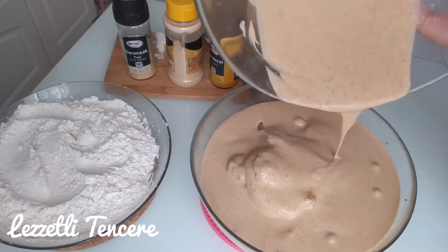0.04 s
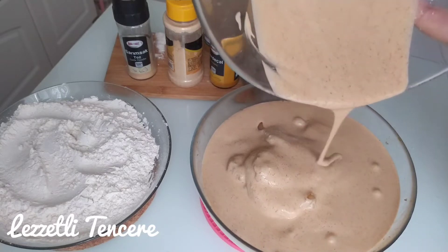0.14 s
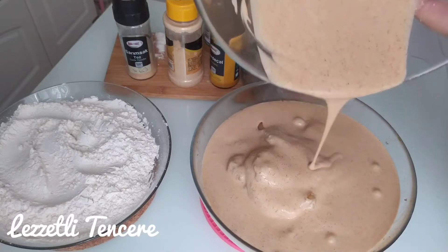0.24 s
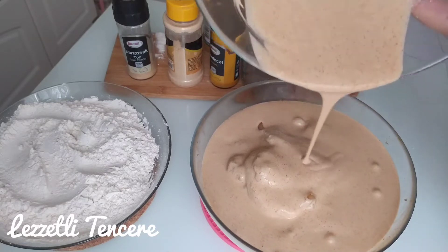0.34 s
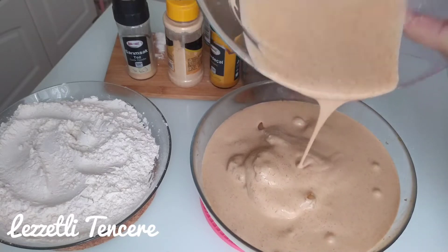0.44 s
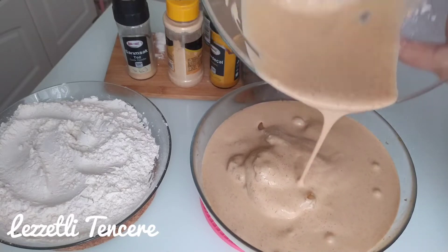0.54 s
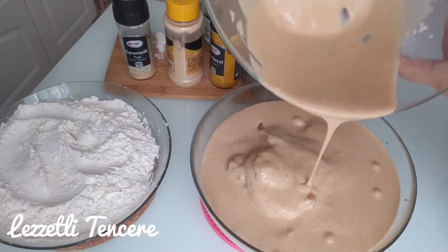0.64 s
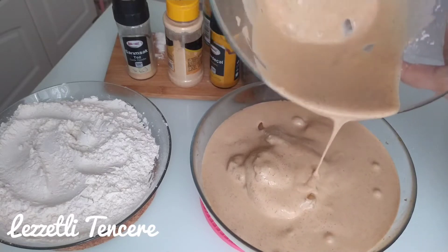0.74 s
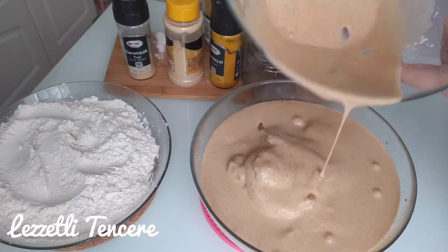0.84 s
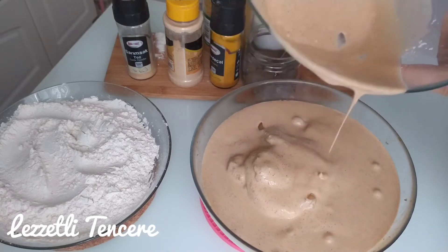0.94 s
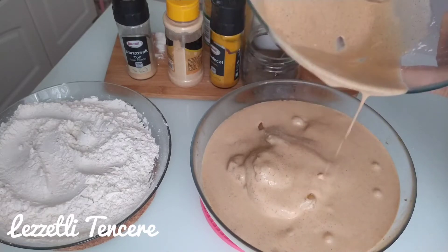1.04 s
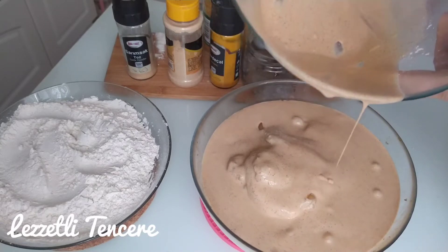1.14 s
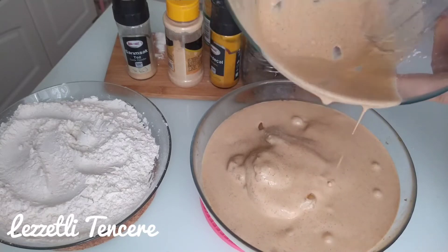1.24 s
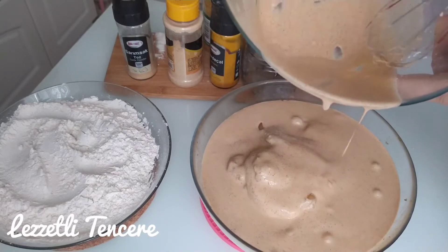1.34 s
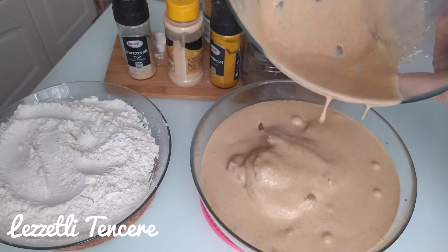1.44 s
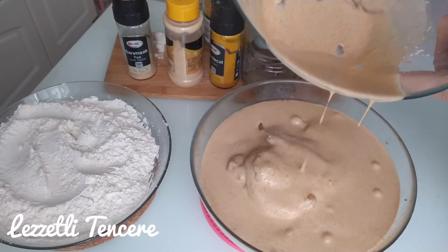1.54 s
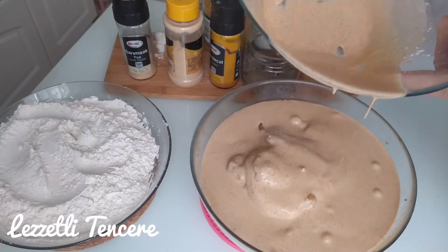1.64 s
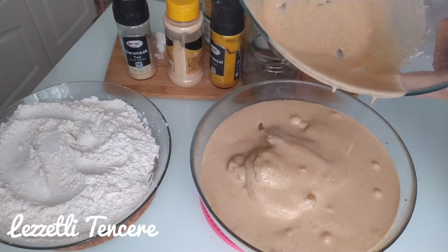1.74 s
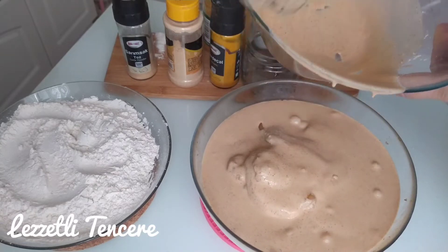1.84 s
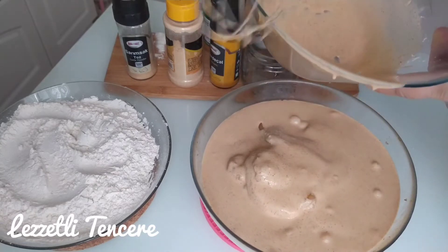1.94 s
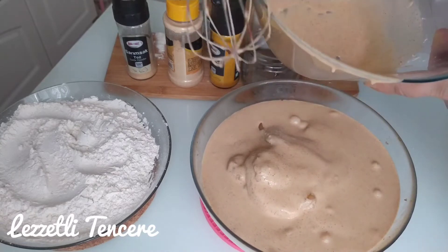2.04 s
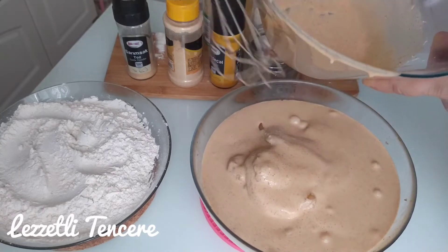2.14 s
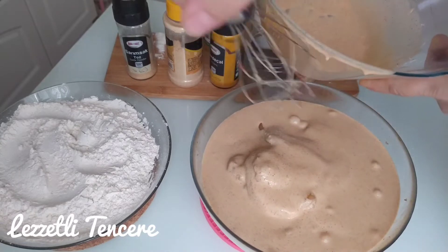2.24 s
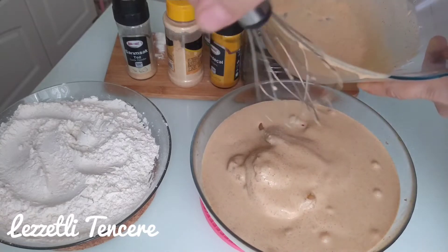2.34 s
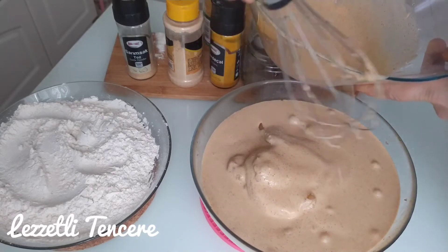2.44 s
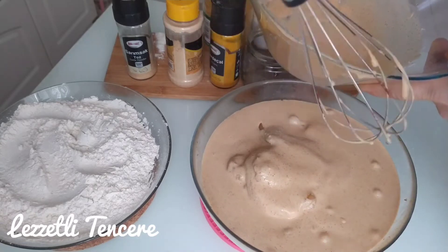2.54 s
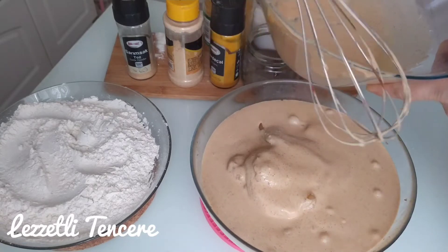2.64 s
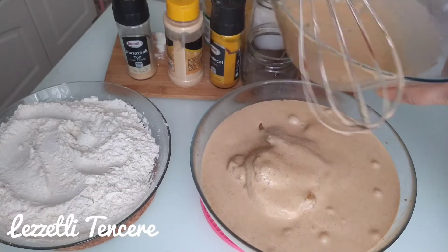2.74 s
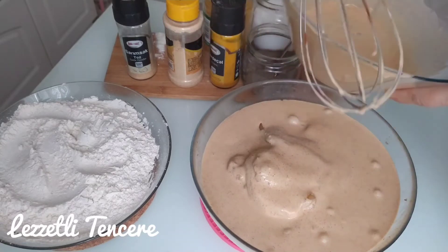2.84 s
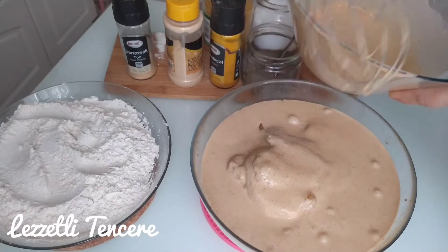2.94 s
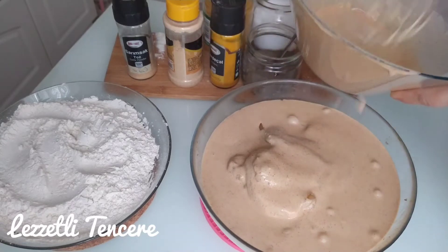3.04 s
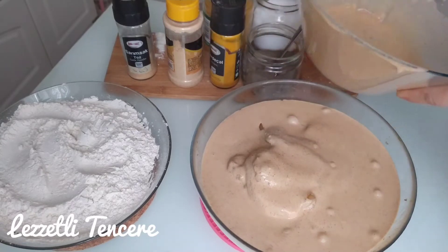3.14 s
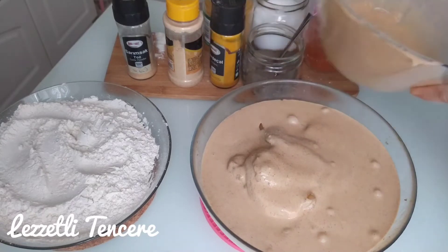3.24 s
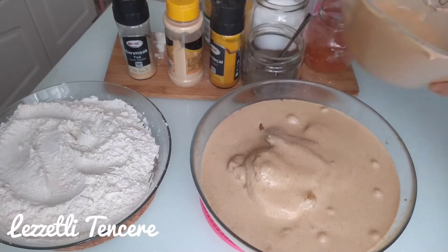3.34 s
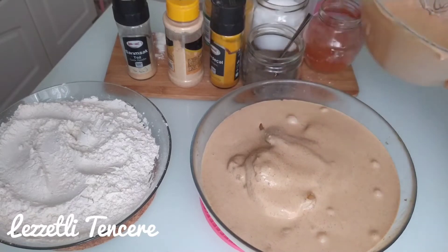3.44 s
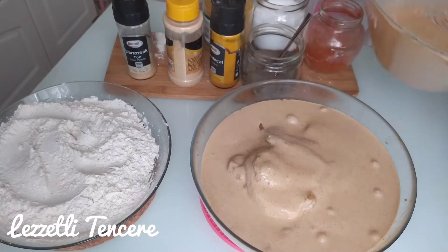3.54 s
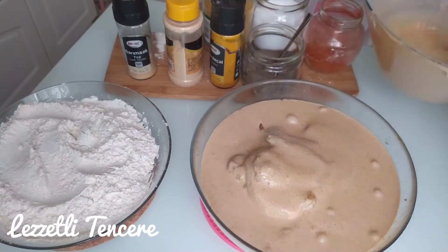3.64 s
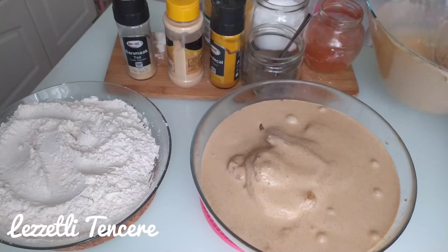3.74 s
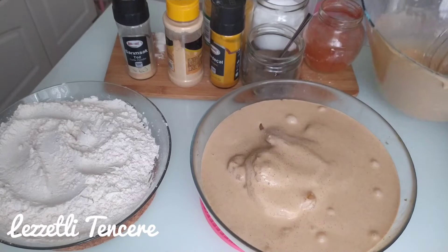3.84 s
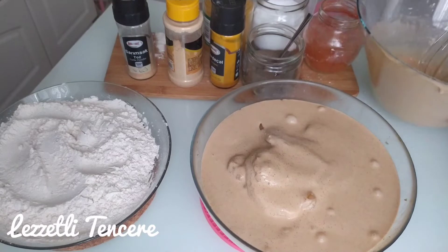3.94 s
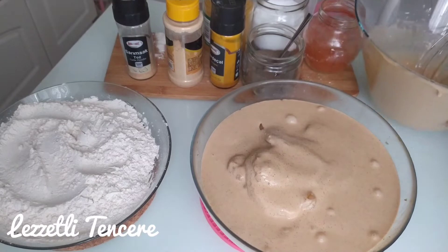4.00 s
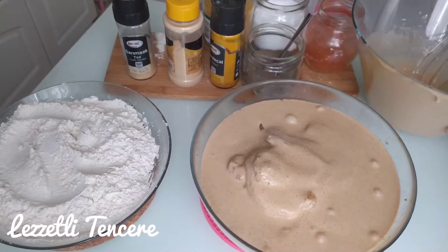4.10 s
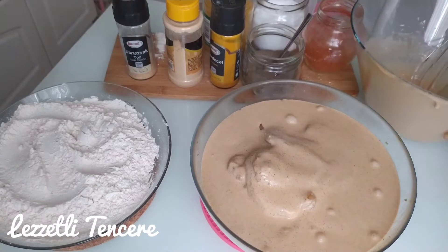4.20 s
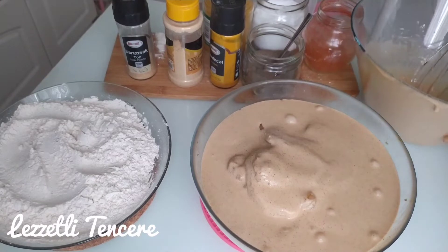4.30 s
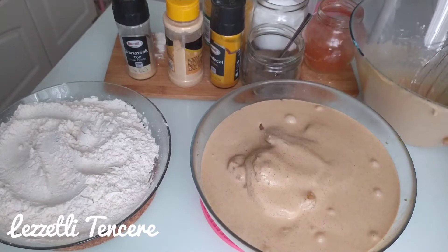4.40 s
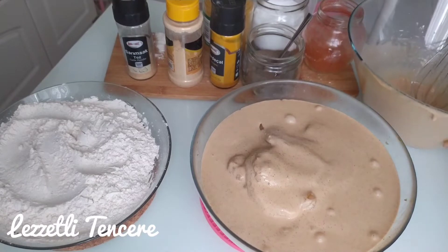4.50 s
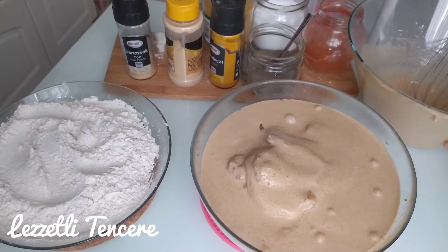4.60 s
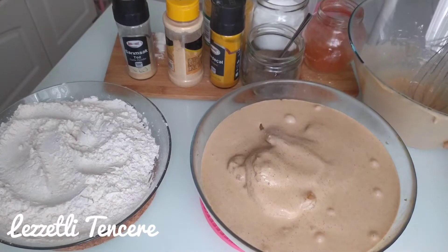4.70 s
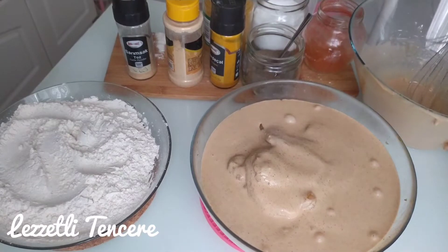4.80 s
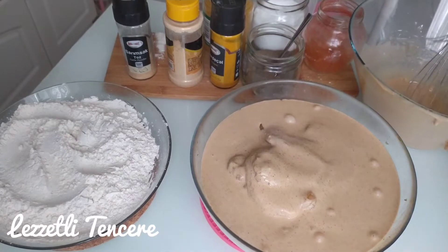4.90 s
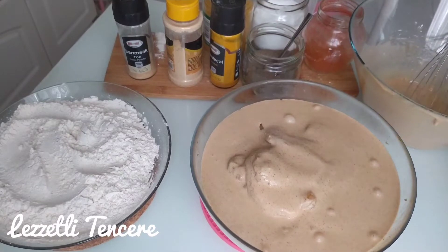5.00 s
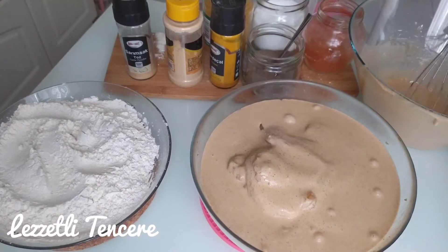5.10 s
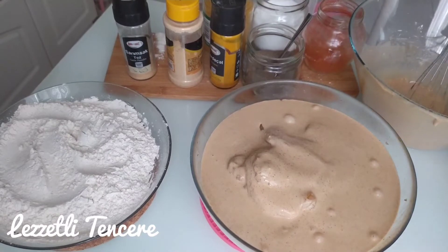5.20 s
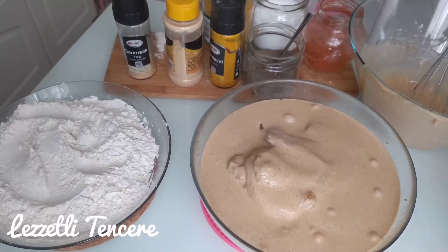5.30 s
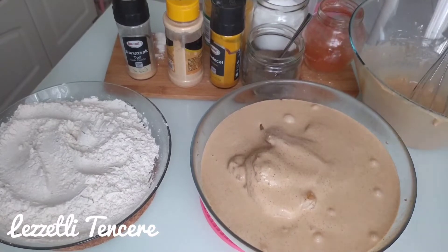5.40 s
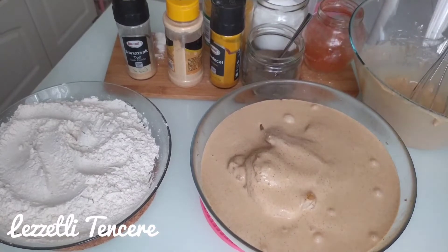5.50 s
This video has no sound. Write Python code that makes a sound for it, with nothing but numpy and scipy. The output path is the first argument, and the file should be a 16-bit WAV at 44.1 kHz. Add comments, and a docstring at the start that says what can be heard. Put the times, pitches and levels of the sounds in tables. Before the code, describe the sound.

Soft batter drips, a sharp glass clink, a heavy whisk knock with bounces, another clink and a bowl set down in a small kitchen.

```python
"""A kitchen table: a batter-coated glass bowl is emptied into another, heard as a few soft drips.
Its rim clinks on glass, a wire whisk drops into it and bounces, and the bowl is set down, rocking.
Glass, wires, handle and table are damped modes; contacts are noise bursts; drips are narrow noise.
Each blow gets a diffuse answer from the small hard kitchen; an appliance hums and rushes faintly."""
import sys
import numpy as np
from scipy import signal
from scipy.fft import rfft, irfft, next_fast_len
from scipy.io import wavfile
from scipy.ndimage import map_coordinates

SR = 44100
rng = np.random.default_rng(int(sys.argv[2]) if len(sys.argv) > 2 else 0)


def log_audio(samples):
    """Write samples as a 16-bit WAV file to the path given in sys.argv[1]."""
    # one column per channel
    frames = np.atleast_2d(samples).T
    # limit to full scale, then quantise
    limited = np.clip(frames, -1, 1)
    pcm = np.round(limited * 32767).astype(np.int16)
    wavfile.write(sys.argv[1], SR, pcm)


N = 245088
T = np.arange(SR * 3 // 4) / SR  # time axis of one blow, s

# stereo likeness of close blows: frequency_hz, left_right_likeness
ALIKE = [(30, 0.52), (130, 0.95), (550, 0.62), (1100, 0), (2000, 0), (12000, 0)]
# whisk wires on glass, contact spectrum: frequency_hz, level_db
WIRES = [(100, -10), (450, 1.5), (1100, -3.5), (2300, -4), (3300, -5.5), (4600, -0.5), (6000, -2.5),
         (7000, -1.5), (10000, 2.5), (12500, -5.5), (15000, -18)]
# standing glass bowl, modes: frequency_hz, level_db, t60_s
STANDING_BOWL = [(925, -3, .06), (1040, -3, .06), (1104, 1, .08), (1319, -1, .08), (1863, -1, .11),
                 (1932, -5, .09), (2326, -11, .07), (2492, -8, .08), (2724, -4, .08), (2800, -6, .06),
                 (3380, -4, .08), (4196, 0, .1), (4275, 1, .09), (5265, -5, .09), (5320, -4, .1),
                 (6980, -7, .08), (7640, -10, .08), (9000, -6, .09)]
# bowl foot on table, contact spectrum: frequency_hz, level_db
LANDING_CRACK = [(60, -63), (480, 4), (750, 3), (1100, 2), (1500, 2.5), (2700, -3.5), (3100, -7),
                 (3400, -3), (3750, -8), (4250, 0), (4800, -4.5), (5300, -10), (5700, -10.5), (6800, -6),
                 (10000, -6), (12500, -6), (15000, -26)]

BUZZ_DB, BUZZ_RATE_PER_S = 3, 240  # glass and handle flutter: depth, knot rate


def amp(db):
    """Decibels to gain."""
    return 10 ** (np.asarray(db) / 20)


def fade(t60_s):
    """Exponential decay, 60 dB in t60_s."""
    return np.exp(-np.log(1000) * T / t60_s)


def unit(x):
    """Scale to rms 1."""
    return x / np.sqrt(np.mean(x ** 2) + 1e-20)


def unit_blow(x):
    """Scale to the energy of 10 ms at rms 1."""
    return unit(x) * np.sqrt(.01 / T[-1])


def along(points, hz):
    """Interpolate (Hz, value) points on a log frequency axis."""
    f, v = np.transpose(points)
    return np.interp(np.log(hz + 1), np.log(f), v)


def filtered(x, response):
    """Apply a frequency response by FFT."""
    n = x.shape[-1]
    m = next_fast_len(n + 8192)
    return irfft(rfft(x, m) * response(np.fft.rfftfreq(m, 1 / SR)), m)[..., :n]


def lowpass_denominator(f, hz):
    """Second-order Butterworth denominator with corner hz."""
    return 1 + 1j * np.sqrt(2) * f / hz - (f / hz) ** 2


def soften(x, hz):
    """A softer contact lasts longer and excites less treble: low-pass at hz."""
    return unit_blow(filtered(x, lambda f: 1 / lowpass_denominator(f, hz)))


def radiate(x, hz):
    """A small body radiates bass poorly: high-pass at hz."""
    return filtered(x, lambda f: -(f / hz) ** 2 / lowpass_denominator(f, hz))


def wobble(rate_per_s, size=N):
    """Smooth random curve through rate_per_s knots a second."""
    knots = rng.standard_normal(int(size * rate_per_s / SR) + 4)
    return map_coordinates(knots, [np.arange(size) * rate_per_s / SR])


def noise(response, size, alike=ALIKE):
    """Coloured stereo noise of rms 1; mid and side weights set the likeness by frequency."""
    def shape(hz):
        angle = np.arccos(np.clip(along(alike, hz), -1, 1)) / 2
        return response(hz) * np.array([np.cos(angle), np.sin(angle)])

    mid, side = filtered(rng.standard_normal((2, size)), shape)
    return unit(np.array([mid + side, mid - side]))


def crack(spectrum, t60_s, rise_s=0.0051):
    """Dense contact vibration: coloured noise that builds over rise_s and dies."""
    burst = noise(lambda hz: amp(along(spectrum, hz)), size=len(T))
    return unit_blow(burst * fade(t60_s) * (1 - np.exp(-T / rise_s)))


def ring(modes, scatter_db, spread=1, detune=0, buzz_db=0):
    """Damped modes, randomly scattered in level and pitch; unlike channels differ in phase."""
    out = np.zeros((2, len(T)))
    for k, (hz, db, t60_s) in enumerate(modes):
        hz = hz * (1 + detune * rng.standard_normal())
        skew = (-1) ** k * spread * np.arccos(np.clip(along(ALIKE, hz), -1, 1)) / 2
        flutter_db = buzz_db * wobble(BUZZ_RATE_PER_S, size=len(T)) if buzz_db else 0
        gain = amp(db + scatter_db * rng.standard_normal() + flutter_db)
        out += gain * fade(t60_s) * np.sin(2 * np.pi * hz * T + [[skew], [-skew]])
    return unit_blow(out * (1 - np.exp(-T / 0.00053)))


def kitchen(x, wet_db, build_s=0.0044):
    """Add the walls' diffuse answer: a noise tail, thickening over build_s, decaying by band."""
    # frequency_hz, t60_s
    wall_t60 = [(150, 0.43), (500, 0.39), (1500, 0.38), (5000, 0.3), (9000, 0.31), (14000, 0.2)]
    # frequency_hz, level_db
    wall_colour = [(60, 3.5), (200, -1.5), (480, -3.5), (700, 3), (950, -4), (1900, 0), (2600, 3),
                   (3700, -1), (5100, -1), (5700, 0), (6400, 0.5), (10000, -1), (15000, -4)]
    source = noise(lambda f: amp(along(wall_colour, f)), size=len(T))
    hz, t, bands = signal.stft(source, SR, nperseg=256)
    bands = bands * np.exp(-np.log(1000) * t / along(wall_t60, hz)[:, None])
    tail = signal.istft(bands, SR, nperseg=256)[1][:, :len(T)]
    tail = unit(tail * (1 - np.exp(-(T / build_s) ** 2))) / np.sqrt(len(T))
    return x + amp(wet_db) * signal.fftconvolve(x[:1], tail, axes=1)[:, :len(T)]


def add(track, start_s, x, pan_db=0):
    """Mix x in at start_s, leaning left by pan_db."""
    part = track[:, round(start_s * SR):][:, :len(T)]
    part += (x * amp([[pan_db / 2], [-pan_db / 2]]))[:, :part.shape[1]]


def favour(modes, hz):
    """The contact point excites the modes near hz most."""
    gain_db, width_octaves = 6, 0.076
    return [(f, db + gain_db * np.exp(-(np.log2(f / hz) / width_octaves) ** 2), t60_s)
            for f, db, t60_s in modes]


def appliance():
    """Steady air noise plus motor harmonics whose shared speed and separate levels waver."""
    # air noise: frequency_hz, density_db_per_hz
    air = [(25, 1), (50, -8), (75, -12.5), (120, -15), (155, -3.5), (240, -5.5), (380, -11), (560, -12.5),
           (660, -9), (850, -19.5), (1050, -18), (1400, -23), (2850, -25.5), (3500, -30.5), (6500, -29.5),
           (9500, -27.5), (11500, -34), (15500, -44.5)]
    # diffuse air: frequency_hz, left_right_likeness
    air_alike = [(30, 0.0063), (130, 0.86), (300, 0.71), (640, 0), (1400, 0)]
    # motor partials: multiple_of_motor_hz, level_db
    motor = [(9, -76.5), (10, -73), (13, -63.5), (14, -84), (20, -81), (22, -79.5), (56, -84)]
    motor_hz = 49.3
    out = amp(-57.0) * noise(lambda f: amp(along(air, f)), size=N, alike=air_alike)
    turns = np.cumsum(motor_hz * (1 + 0.0006 * wobble(rate_per_s=3.68))) / SR
    for multiple, db in motor:
        partial = np.sin(2 * np.pi * (multiple * turns + rng.random()))
        out += amp(db + 1.5 * wobble(rate_per_s=6.7)) * np.sqrt(2) * partial
    return out


def wire_contact(t60_s, ring_db, hz):
    """A thin wire catches on glass: a bright, grainy tick plus the ringing whisk loops."""
    # whisk loops, modes: frequency_hz, level_db, t60_s
    loops = [(3440, -2, 0.11), (4197, -6, 0.13), (4590, -4, 0.12), (5300, -6, .08), (4890, -6, 0.06),
             (7600, -3, .1), (8622, -3, .09), (9060, -2, 0.09), (9525, -3, .09), (10400, -6, .07),
             (11900, -9, .06)]
    grain = amp(4.1 * wobble(rate_per_s=320, size=len(T)))
    scrape = unit_blow(crack(WIRES, t60_s, rise_s=0.013) * grain)
    # loops bend under pressure, so pitch varies from touch to touch
    loop_ring = ring(loops, scatter_db=5.0, detune=0.00665)
    return kitchen(soften(scrape + amp(ring_db) * loop_ring, hz), wet_db=-2.5)


def wire_ticks():
    """Single wire touches on the bowl, each a short contact with a faint loop ring."""
    # start_s, level_db, brightness_hz
    tick_events = [(.459, -59, 14000), (1.976, -45.5, 12500), (2.57, -50, 6300), (2.953, -49, 7650),
                   (3.838, -36.5, 11600), (4.509, -52.5, 9920), (4.575, -52.5, 11100), (4.691, -61, 11960),
                   (4.854, -50, 11200)]
    out = np.zeros((2, N))
    for start_s, db, hz in tick_events:
        add(out, start_s, amp(db) * wire_contact(t60_s=0.026, ring_db=-13.5, hz=hz))
    return out


def drips():
    """Batter drops land with a tiny pop: narrow-band noise, quickly damped."""
    # start_s, level_db, centre_hz
    drip_events = [(0.987, -60, 5440), (1.246, -58, 3930)]
    out = np.zeros((2, N))
    for start_s, db, hz in drip_events:
        narrow = noise(lambda f: 1 / np.sqrt(1 + ((f - hz) / 350) ** 2), size=len(T))
        add(out, start_s, amp(db) * kitchen(unit_blow(narrow * fade(0.044)), wet_db=-11))
    return out


def rim_clinks():
    """Rim on the other bowl, later on a jar: hard snap, gritty crack, short buzzing ring."""
    # start_s, level_db, brightness_hz, left_right_db, jar_share_0_to_1, snap_db
    clink_events = [(1.3566, -24.5, 14700, 2.5, 0.15, -6), (1.3637, -32, 11900, -6, 0, -34),
                    (3.6850, -26.5, 9800, 2, 0.93, -10.5)]
    # bowl rim, modes: frequency_hz, level_db, t60_s
    rim_modes = [(1450, 1, .017), (2350, -12, .035), (3500, -5, .03), (3733, -1, .03), (3815, -2, .04),
                 (3955, 1, .07), (4250, -5, .025), (4613, -8, .09), (4826, -3, .03), (4940, 1, .025),
                 (5200, -2, .025), (7612, 1, .04), (9000, 2, .045), (9240, 0, .035), (9530, 0, .04),
                 (9820, -3, .04), (10750, -6, .03)]
    # jar, modes: frequency_hz, level_db, t60_s
    jar_modes = [(3440, -7, .035), (3540, -3, .045), (3784, 1, .055), (4030, 0, .045), (4900, -4, .04),
                 (6690, -5, .05), (6950, -7, .04), (9600, -8, .05)]
    # glass contact spectrum: frequency_hz, level_db
    clink_crack = [(100, -19), (300, -17), (520, 0.5), (950, -17), (1900, -11), (3000, -9), (3800, 7),
                   (5000, -6.5), (5750, -5), (6700, 1), (8200, -1), (9500, 4.5), (12000, 1.5), (15000, -11)]
    jar_lean_db = 1  # to the left
    out = np.zeros((2, N))
    for start_s, db, hz, pan_db, jar_share, snap_db in clink_events:
        rim_ring = ring(rim_modes, scatter_db=1.5, buzz_db=BUZZ_DB)
        jar_ring = ring(jar_modes, scatter_db=-0.5, buzz_db=BUZZ_DB)
        jar_ring = jar_ring * amp([[jar_lean_db / 2], [-jar_lean_db / 2]])
        mix = (1 - jar_share) * rim_ring + jar_share * jar_ring
        glass = unit_blow(mix * (1 - np.exp(-T / 0.00068)))
        grit = amp(0.5) * crack(clink_crack, t60_s=0.04, rise_s=0.0075)
        snap = amp(snap_db) * crack(clink_crack, t60_s=0.001, rise_s=0.0001)
        clink = kitchen(soften(glass + grit + snap, hz), wet_db=-6.5, build_s=0.0048)
        add(out, start_s, amp(db) * clink, pan_db)
    return out


def wire_slides():
    """Sliding wires stick and slip: runs of small ticks at uneven times and strengths."""
    # start_s, length_s, level_db, change_by_end_db, loop_ring_db
    slide_events = [(1.997, 0.074, -51, -6, -2), (2.402, 0.065, -57.5, -9, -6), (2.49, 0.088, -60.5, 1, -1),
                    (4.536, 0.028, -60.5, 0, -22.5), (4.837, .015, -56, 0, -11),
                    (4.916, .3, -63.5, -14.5, -3.5)]
    slips_per_s, scatter_db, brightness_hz = 70, 2.5, 10700
    out = np.zeros((2, N))
    for start_s, length_s, db, change_db, ring_db in slide_events:
        slips = max(1, round(length_s * slips_per_s))
        for k in range(slips):
            slip_db = db + change_db * k / slips + scatter_db * rng.standard_normal()
            jitter = rng.uniform(-0.34, 0.46) * (k > 0)  # first slip stays on time
            slip_s = start_s + length_s * (k + jitter) / slips
            add(out, slip_s, amp(slip_db) * wire_contact(0.041, ring_db, brightness_hz))
    return out


def whisk_knocks():
    """The whisk drops and bounces: wires touch first, its weight follows, duller, with a low jolt."""
    # start_s, level_db, touch_brightness_hz, weight_damping_t60_s
    knock_events = [(2.8391, -14.5, 4940, 0.083), (2.952, -24, 2350, 0.014), (3.0143, -38, 1090, 0.017)]
    # held, batter-coated bowl, modes before contact damping: frequency_hz, level_db, t60_s
    held_bowl = [(248, -18, .06), (385, -21, .04), (532, -4, .036), (612, -14, .13), (662, -18, .16),
                 (750, -13, .05), (858, -4.5, .054), (1000, -11, .03), (1056, -4, .044), (1116, -7, .065),
                 (1335, -8, .03), (1425, -4.5, .017), (1690, -18, .03), (1830, -22, .03), (2130, -21, .03),
                 (2360, -19, .13), (2780, -19, .035), (2950, -19, .04), (4064, -14, .025)]
    # knock contact spectrum: frequency_hz, level_db
    knock_crack = [(30, -7), (90, -23), (300, -14.5), (1500, 14), (2400, 5), (3400, -6), (4200, -1.5),
                   (5800, -7), (9000, -2.5), (12000, -39), (16000, -12)]
    # bowl radiation balance: frequency_hz, left_right_db
    bowl_lean = [(150, -2), (380, 5.5), (700, 0.5), (1250, -1), (2500, -0.5)]
    # low thud, modes: frequency_hz, level_db, t60_s
    jolt_modes = [(36.2, 0, 0.237), (52, 0, 0.22)]
    jolt_db, follow_s = -29, .00204  # thud re knock; delay from wires to weight
    out = np.zeros((2, N))
    lean = lambda f: amp(along(bowl_lean, f) * np.array([[.5], [-.5]]))
    for start_s, db, hz, damping_t60_s in knock_events:
        wires = radiate(ring(held_bowl, scatter_db=3) * fade(0.026), hz=830)
        touch = soften(unit_blow(wires) + amp(1.0) * crack(knock_crack, t60_s=0.041), hz)
        damped = ring(held_bowl, scatter_db=1, spread=0.3) * fade(damping_t60_s)
        weight = soften(radiate(damped, hz=290), hz=1020)
        blow = amp(-8.0) * touch + np.roll(weight, round(follow_s * SR), axis=1)
        blow += amp(-30.0) * crack(WIRES, t60_s=0.017)  # bare steel tick
        knock = kitchen(unit_blow(blow), wet_db=-8.5, build_s=0.0099)
        add(out, start_s, amp(db) * filtered(knock, lean))
        add(out, start_s, amp(db + jolt_db) * ring(jolt_modes, scatter_db=8.0))
    return out


def handle_taps():
    """The hollow handle rolls on the rim: a short, woody ping of fluttering modes."""
    # start_s, level_db
    tap_events = [(3.8442, -41.5)]
    # handle, modes: frequency_hz, level_db, t60_s
    handle_modes = [(474, -5, 0.051), (2190, 2, .04), (2310, -1, 0.047), (2540, -3, 0.048),
                    (2710, -11, 0.038)]
    out = np.zeros((2, N))
    for start_s, db in tap_events:
        ping = ring(handle_modes, scatter_db=0, buzz_db=BUZZ_DB)
        add(out, start_s, amp(db) * kitchen(ping, wet_db=-11.5))
    return out


def chatter(start_s, db, modes, count):
    """The shaken whisk rattles on the glass at uneven times, ever more weakly."""
    spacing_s, first_db, loss_db_per_touch = 0.014, -18, 1.5
    out = np.zeros((2, N))
    for k in range(count):
        touch_s = start_s + spacing_s * (k + 1 + rng.uniform(-.5, 0.36))
        touch_db = db + first_db - loss_db_per_touch * k
        touch = ring(modes, scatter_db=10, detune=0.015) * fade(0.064)
        touch += amp(2.0) * crack(LANDING_CRACK, t60_s=0.0059)
        add(out, touch_s, amp(touch_db) * kitchen(soften(touch, hz=5400), wet_db=-2.5))
    return out


def bowl_landings():
    """The bowl's foot rings the glass and thumps the table; hard landings slap twice and chatter."""
    # start_s, level_db, brightness_hz, table_thud_db, favoured_hz
    landing_events = [(4.1225, -30, 9400, -11.5, 1870), (4.2237, -39, 2300, -1.5, 600),
                      (4.3070, -47, 4200, -8, 2600), (4.3487, -31, 6940, -1, 3400)]
    # table top, modes: frequency_hz, level_db, t60_s
    table_modes = [(153, -11, 0.27), (205, -4, 0.07), (255, -3, 0.055), (330, -1, 0.06), (424, 0, 0.04),
                   (480, 2, 0.055), (545, -1, .055), (598, -1, 0.07), (632, -2, 0.1), (684, -11, 0.06)]
    hard_above_db, slap_delay_s, slap_db = -35, .013, -3  # slap: far side of the foot
    thump_db, thump_t60_s = 1, 0.05  # thump re thud; extra damping by the bowl's weight
    out = np.zeros((2, N))
    for start_s, db, hz, thud_db, favoured_hz in landing_events:
        hard = db > hard_above_db
        glass_modes = favour(STANDING_BOWL, favoured_hz)
        wood_modes = favour(table_modes, favoured_hz)
        touches = [(0, 0), (slap_delay_s, slap_db)] if hard else [(0.00042, 0)]
        for delay_s, touch_db in touches:
            contact = amp(1.5) * crack(LANDING_CRACK, t60_s=0.039, rise_s=0.0038)
            glass = soften(ring(glass_modes, scatter_db=3.5) + contact, hz)
            thud = amp(thud_db) * ring(wood_modes, scatter_db=2.5, spread=0.6, detune=0.012)
            blow = (glass + thud) * (1 - np.exp(-T / 0.0022))
            add(out, start_s + delay_s, amp(db + touch_db) * kitchen(blow, wet_db=-2.5))
        thump = ring(wood_modes, scatter_db=1, spread=0.58) * fade(thump_t60_s)
        thump = radiate(unit_blow(thump * (1 - np.exp(-T / 0.0086))), hz=112)
        add(out, start_s, amp(db + thud_db + thump_db) * kitchen(thump, wet_db=-4.0))
        if hard:
            out += chatter(start_s + slap_delay_s, db, glass_modes, count=5)
    return out


def nudges():
    """The settling whisk nudges the standing bowl: its glass modes ring alone."""
    # start_s, level_db
    nudge_events = [(4.92, -61.5), (5.07, -62.5)]
    out = np.zeros((2, N))
    for start_s, db in nudge_events:
        add(out, start_s, amp(db) * kitchen(ring(STANDING_BOWL, scatter_db=9), wet_db=0))
    return out


def scene():
    """Sum of all sources on and around the table."""
    out = appliance() + wire_ticks() + drips() + rim_clinks() + wire_slides()
    return out + whisk_knocks() + handle_taps() + bowl_landings() + nudges()


def record(dry):
    """Steep low-pass: almost nothing passes above top_hz."""
    top_hz = 15750
    return filtered(dry, lambda hz: 1 / np.sqrt(1 + (hz / top_hz) ** 120))


dry = scene()
out = record(dry)
log_audio(out)
```